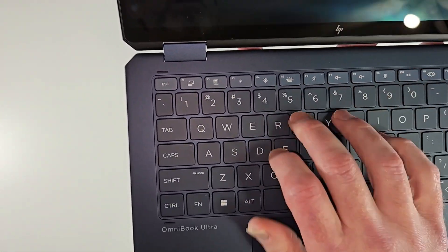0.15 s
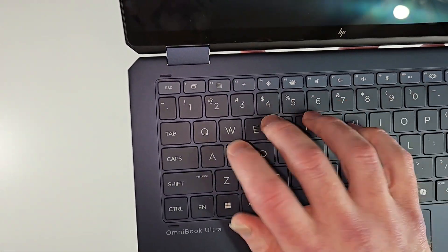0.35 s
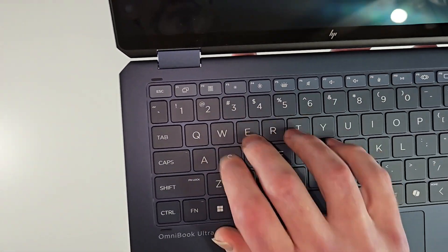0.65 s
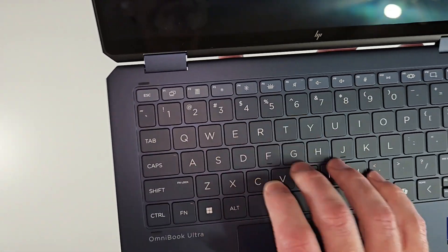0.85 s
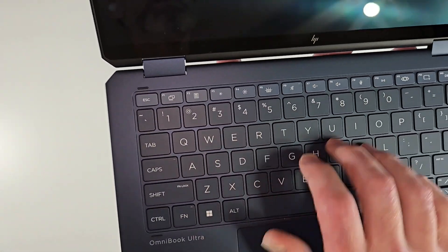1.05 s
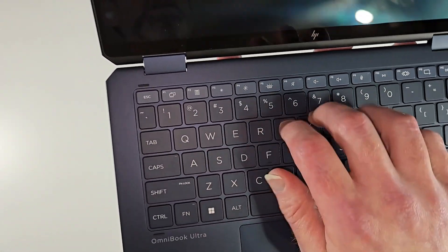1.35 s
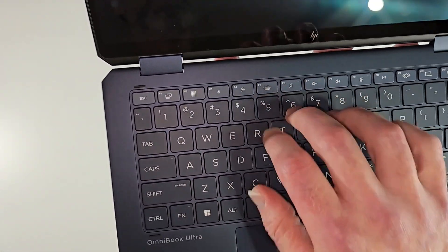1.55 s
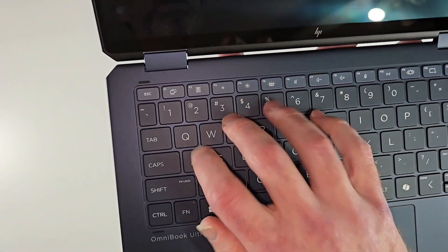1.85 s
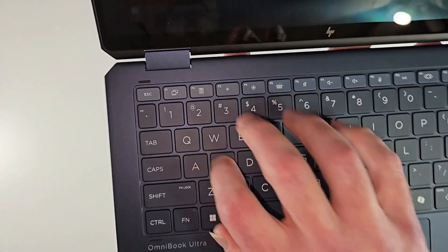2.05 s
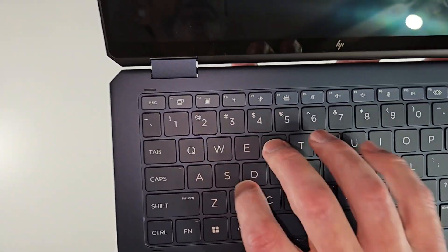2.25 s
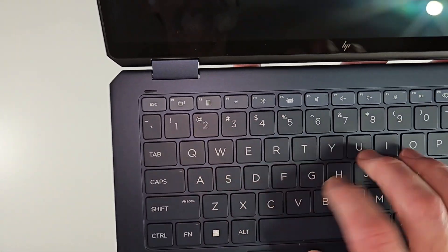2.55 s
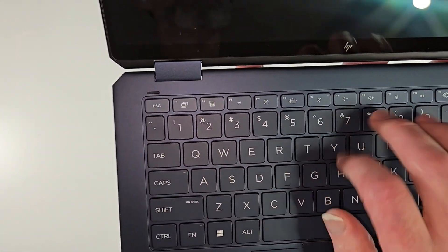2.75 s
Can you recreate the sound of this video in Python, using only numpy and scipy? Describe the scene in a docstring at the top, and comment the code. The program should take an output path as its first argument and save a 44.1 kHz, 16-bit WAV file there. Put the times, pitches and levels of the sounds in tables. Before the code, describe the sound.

Quick, uneven typing on a laptop keyboard runs throughout, about three seconds, close up in stereo. Each stroke is a plastic click with a soft desk thud, with lighter taps and faint finger brushing between. Near 1.7 seconds fingertips catch on key edges with thin rasps. At about 1.9 a dull bump leaves a brief low rumble. Firmer strokes return from 2.4. The small room adds short echoes.

```python
"""Quick typing on a laptop that stands on a desk, heard close up in stereo in a small room.
Each stroke rattles the keycap, then snaps it down: the plastic cracks, the case rings, the desk thuds.
Keys spring back with lighter taps, finger pads land with a round "tok" and brush over the caps.
One dull bump leaves a low rumble. Short room echoes and still air lie behind."""
import sys
import numpy as np
from scipy import signal
from scipy.fft import rfft, irfft
from scipy.io import wavfile

SR = 44100
rng = np.random.default_rng(int(sys.argv[2]) if len(sys.argv) > 2 else 0)


def master(y):
    """Save y as 16-bit WAV."""
    cut = np.clip(np.atleast_2d(y).T, -1, 1)
    pcm = np.round(cut * 32767)  # scale
    wavfile.write(sys.argv[1], SR, pcm.astype(np.int16))


N = 127890
T = np.arange(int(.2 * SR)) / SR  # time axis of one event, s


def keys():
    """Full strokes, plus light taps from first touches, rebounds and key returns."""
    # Each row: start in s, rattle lead in s, thud, case, knock, clack and tick levels in dB,
    # left over right in dB, cap note in Hz.
    strokes = [(-0.02, 0.004, -33, -39, -40, -41, -31, 0.5, 2330),
               (0.1327, 0.0032, -40, -38, -38.5, -36.5, -36, -1, 2027),
               (0.3314, 0.0068, -38.5, -39, -39, -41, -39.5, 1, 2380),
               (0.61, 0.0048, -45, -45.5, -48.0, -43, -39.5, 0, 2154),
               (0.9022, 0.0043, -40, -47, -49.5, -42.5, -39, 0, 2500),
               (1.1001, 0.0042, -40.5, -45.5, -55.5, -49, -48.5, 0.2, 2620),
               (1.267, 0.0036, -33.5, -33, -36.5, -42.5, -37, 0.5, 4260),
               (1.491, 0.0053, -40, -40, -42, -42, -39, 0, 3760),
               (1.8575, 0.0072, -47.5, -45, -38.5, -40.5, -41, -0.5, 2590),
               (2.4393, 0.0025, -34, -44.5, -45.5, -43, -40, 1, 2400),
               (2.571, 0.0041, -36.5, -37.5, -44.5, -53.5, -42.5, -0.5, 4770),
               (2.7656, 0.0093, -38, -39, -40, -40.5, -39.5, 0, 2260)]
    # Each row: start in s, thud, case, knock, clack and tick levels in dB.
    taps = [(0.1165, -48.5, -51, -53, -64, -51.5), (0.1215, -46, -46, -52, -59, -55),
            (0.275, -84, -60, -62.5, -68, -63), (0.3364, -48, -42.5, -34, -45.5, -39.5),
            (0.4279, -54, -66, -61, -57, -50.5), (0.4323, -56, -50, -50.5, -45, -52),
            (0.6151, -51.5, -75, -59, -48, -55), (0.6182, -45, -49.5, -48, -64, -45),
            (0.7134, -48.5, -70, -51, -59, -47.5), (0.7176, -59, -51.5, -74, -63, -49.5),
            (0.788, -58, -82, -53, -72, -57.5), (0.8057, -50, -48, -88, -51.5, -45),
            (1.0074, -49, -54.5, -57.5, -61, -50), (1.0962, -43.5, -41, -45.5, -56.5, -46.5),
            (1.2721, -40.5, -46.5, -47, -42, -45), (1.3517, -54, -54.5, -49.5, -55, -48.5),
            (1.503, -56, -66, -67, -75, -54), (1.6565, -48, -50.5, -59, -67, -50.5),
            (1.6616, -43.5, -73, -47.5, -53.5, -54), (1.681, -44, -41.5, -40, -49.5, -51),
            (1.7247, -56, -50, -67, -68, -57), (1.8483, -53, -40, -65, -52, -48),
            (1.962, -45.5, -50, -49.5, -65, -49), (1.9689, -78, -74, -58, -55, -52.5),
            (2.0925, -70, -53.5, -56.5, -62.5, -52.5), (2.1267, -56, -58, -58.5, -62, -54.5),
            (2.138, -55, -55.5, -86, -59, -53), (2.2014, -67, -67, -62, -61.5, -52),
            (2.3265, -55, -50.5, -52.5, -67, -51), (2.334, -41.5, -65, -53, -53.5, -46),
            (2.5597, -50.5, -60, -55, -60, -53.5), (2.5737, -49, -46.5, -70, -51, -41.5),
            (2.6746, -44.5, -49.5, -74, -61, -48), (2.681, -55.5, -60, -51, -53, -49.5),
            (2.736, -56, -69, -53, -57, -54.5)]
    out = np.zeros((2, N))
    for start_s, lead_s, *levels_db, pan_db, cap_hz in strokes:
        pan = amp(np.array([[pan_db], [-pan_db]]) / 2)
        cap = amp(-10) * note(cap_hz, t60_s=.026)
        add(out, pan * rattle(lead_s, levels_db), start_s - lead_s)
        add(out, pan * snap(levels_db, cap), start_s)
        add(out, pan * bottom_out(*levels_db[:2]), start_s)
    for start_s, *levels_db in taps:
        add(out, snap(levels_db), start_s)
    return out


def snap(levels_db, cap=0):
    """Plastic cracks and buzzes briefly; the case rings, with the cap's own note if given."""
    # Each row: frequency in Hz, gain in dB.
    crack_shape = [(60, -9), (200, 3), (300, -9.5), (900, -9), (2200, -0.5), (3000, -1), (4500, -1),
                   (6000, -7.5), (9000, -2), (10500, -7.5), (12500, -2), (16000, -6.5)]
    snap_s, buzz_s = .0005, .0071
    envelope = np.exp(-T / snap_s) + amp(-8.5) * np.exp(-T / buzz_s)
    crack = colour(noise() * envelope, crack_shape)
    mid_only = np.array([[1], [0]])
    return weight_bands(crack + amp(-19) * case_ring() + cap * mid_only, levels_db)


def rattle(length_s, levels_db):
    """The loose cap chatters under the finger, louder as it goes down."""
    rise_db, stop_s = 9, .0014
    chatter = noise() * amp(3.5 * rng.standard_normal(len(T)))
    rise = amp(rise_db * np.minimum(T / length_s - 1, 0))
    stop = np.exp(-np.maximum(T - length_s, 0) / stop_s)
    bass_cut_db = np.linspace(14, 0, len(levels_db))
    return weight_bands(chatter * rise * stop, np.array(levels_db) - 6.5 - bass_cut_db)


def bottom_out(thud_db, case_db):
    """A key hits bottom: the desk swings a few times and the case gives a hollow note."""
    desk_hz, thump_s = 93.8, .032
    swell = np.sin(np.pi * np.minimum(T / thump_s, 1)) ** 2
    thump = amp(thud_db - 1.5) * swell * np.sin(2 * np.pi * desk_hz * T)
    return thump + amp(case_db - 2) * note(hz=788.5, t60_s=.082)


def case_ring():
    """Mid and side ringing of the case on the desk, a little different under every key."""
    # Each row: frequency in Hz, level in dB, T60 in s.
    modes = [(118, -3, 0.067), (177.3, 9.5, 0.039), (249, -12.5, 0.13), (367.8, -2.5, 0.067),
             (424, -5.5, 0.049), (590, -4.5, 0.07), (666.3, -5, 0.074), (788, -1.5, 0.12),
             (1155, 2.5, 0.039), (1241, 0, 0.046), (1369, -2, 0.06), (2165, -5.5, 0.06),
             (2353, -7.5, 0.072), (2566, -11, 0.076)]
    scatter_db, detune_ratio = 4, .0094
    ring = np.zeros((2, len(T)))
    for k, (hz, db, t60_s) in enumerate(modes):
        size, detune = rng.standard_normal((2, 2, 1))
        mid_sign, side_sign = rng.choice([-1, 1], 2)
        sign = np.array([[1 if k < 3 else mid_sign], [side_sign]])  # lowest modes keep their mid polarity
        ring += sign * amp(db + scatter_db * size) * note(hz * (1 + detune_ratio * detune), t60_s)
    return ring


def finger_pads():
    """Soft landings: two quickly damped notes of the case, a trace of its longer ringing and a faint tick."""
    # Each row: start in s, level in dB, low note in Hz, high note in Hz, tick level in dB.
    landings = [(0.23, -48, 753, 1190, -49), (0.766, -37, 674, 1180, -44), (1.061, -46, 765, 1150, -46),
                (1.196, -39.5, 680, 1050, -43.5), (1.311, -45, 690, 1250, -50),
                (1.571, -42.5, 794, 1134, -42.5), (2.022, -40, 624, 1305, -41.5),
                (2.302, -48.5, 740, 1030, -54), (2.506, -43.5, 680, 1100, -45),
                (2.733, -45.5, 590, 1070, -48), (2.756, -34, 758, 1460, -34.5)]
    tick_hz_db = [(300, 3), (1400, 9), (3000, .5), (15000, 5.5)]
    tick_s = .0067
    out = np.zeros((2, N))
    for start_s, db, low_hz, high_hz, tick_db in landings:
        tok = note(low_hz, t60_s=.042) + amp(-5.5) * note(high_hz, t60_s=.036)
        tick = colour(noise() * np.exp(-T / tick_s), tick_hz_db)
        ring = amp(-23.5) * spread(case_ring(), width=.86)
        add(out, amp(db) * (tok + ring) + amp(tick_db - 8) * tick, start_s)
    return out


def brushing():
    """Skin slides over matt plastic with a grainy hiss, catches on cap edges and slips with a thin rasp."""
    # Each row: start in s, length in s, level in dB.
    slides = [(-.04, 0.12, -52), (0.731, 0.15, -57.5), (0.942, 0.12, -55.5), (1.112, 0.039, -54.5),
              (1.672, 0.043, -48.5), (1.712, 0.042, -49), (1.999, 0.046, -57.5), (2.316, 0.13, -55.5),
              (2.469, 0.049, -58.5), (2.634, 0.037, -54.5), (2.701, 0.056, -56.5), (2.811, 0.05, -64)]
    # Each row: start in s, level in dB.
    catches = [(1.6885, -43), (1.6945, -40), (1.7258, -37), (1.746, -47), (2.389, -41)]
    # Each row of both: frequency in Hz, gain in dB.
    hiss_shape = [(200, -3), (1000, 4.5), (2500, 0), (6000, 0), (8700, 1.5), (12500, 1.5), (16000, 3)]
    rasp_shape = [(300, -20), (7000, -9), (8700, 9), (10500, -6)]
    slip_s = .0034
    out = np.zeros((2, N))
    for start_s, length_s, db in slides:
        grains = noise() * amp(2 * rng.standard_normal(len(T)))
        hiss = spread(unit(colour(grains, hiss_shape)), width=.99)
        arch = np.maximum(np.sin(np.pi * np.minimum(T / length_s, 1)), 0)
        add(out, amp(db) * np.sqrt(arch) * hiss, start_s)
    for start_s, db in catches:
        slip = noise() * np.exp(-T / slip_s)
        add(out, amp(db) * colour(slip, rasp_shape), start_s)
    return out


def bump():
    """A dull bump that darkens as it dies, with a low rumble."""
    # Each row: band centre in Hz, level in dB, T60 in s.
    bump_bands = [(59.6, -6, 0.39), (130, 12.5, 0.21), (236, 17, 0.38), (353, 11, 0.29), (493, 10.5, 0.36),
                  (670, 5.5, 0.36), (1270, -1, 0.22), (3140, -8.5, 0.15), (7150, -20, 0.055),
                  (15000, -31, .06)]
    # Each row: frequency in Hz, gain in dB.
    rumble_shape = [(20, -3), (70, 3), (140, -12.5), (350, -13), (800, -39), (3000, -43.5)]
    # Each row: time in s, level in dB.
    rumble_level = [(1.859, -44.5), (1.951, -46), (2.05, -53.5), (2.2, -67), (2.33, -61), (2.42, -84)]
    times_s, db = np.array(rumble_level).T
    envelope = np.interp(np.arange(N) / SR, times_s, amp(db), left=0, right=0)
    out = spread(unit(colour(noise(N), rumble_shape)) * envelope, width=.3)
    add(out, amp(.5) * tail(bump_bands), start_s=1.8795)
    return out


def room_echo(x):
    """A short echo that builds up over the first milliseconds."""
    # Each row: band centre in Hz, level in dB, T60 in s.
    echo_bands = [(51.3, 6.5, 0.07), (107, -10.5, .28), (218, -8.5, 0.28), (600, -8.5, 0.37),
                  (1460, -9.5, 0.28), (3330, -8, 0.38), (7650, -11.5, 0.32), (14000, -11.5, 0.32)]
    gap_s, build_s = .004, .0076
    echo = tail(echo_bands)
    build = np.clip((np.arange(echo.shape[1]) / SR - gap_s) / build_s, 0, 1)
    return signal.fftconvolve(x, echo * build, axes=1)[:, :N]


def wall_echo(x):
    """The bass and a band near 700 Hz come back once from the wall."""
    # Each row: frequency in Hz, gain in dB.
    wall_shape = [(30, -32), (60, -0.5), (90, 5.5), (140, -4), (250, -28.5), (700, 1), (2000, -65),
                  (8000, -63)]
    out = np.zeros((2, N))
    add(out, amp(-4.5) * colour(x, wall_shape), start_s=.0165)
    return out


def room_air():
    """Still air: faint, steady, low noise."""
    # Each row: frequency in Hz, gain in dB.
    air_shape = [(25, -24.5), (100, 11.5), (300, 1), (700, -9.5), (2000, -19.5), (6000, -28), (16000, -29)]
    return amp(-61.5) * spread(unit(colour(noise(N), air_shape)), width=.35)


def weight_bands(mid_side, levels_db):
    """Set the thud, case, knock, clack and tick bands of a blow; higher bands are wider."""
    # Edges of the five bands in Hz.
    edges_hz = [65, 300, 950, 1700, 5000, 17000]
    # Side-to-mid gain of each band.
    widths = [.08, .22, .42, .8, 1]
    blow_samples = int(.012 * SR)
    out = 0
    for band_hz, db, width in zip(zip(edges_hz, edges_hz[1:]), levels_db, widths):
        band = signal.sosfilt(signal.butter(3, band_hz, "band", fs=SR, output="sos"), mid_side)
        onset_energy = np.sum(band[:, :2 * blow_samples] ** 2, axis=1, keepdims=True)
        out = out + amp(db) * spread(band / np.sqrt(onset_energy / blow_samples), width)
    return out


def tail(bands):
    """Diffuse ringing with a level and decay per band; narrow in the bass, wide in the treble."""
    t = np.arange(SR // 2) / SR
    log_hz = np.log(np.fft.rfftfreq(len(t), 1 / SR) + 1)
    log_centres = np.log([row[0] for row in bands])
    spectrum = rfft(noise(len(t)))
    out = 0
    for share, (hz, db, t60_s) in zip(np.eye(len(bands)), bands):
        envelope = np.exp(-np.log(1000) * t / t60_s)
        envelope /= np.sqrt(np.sum(envelope ** 2))
        band = irfft(spectrum * np.interp(log_hz, log_centres, share), len(t))
        out = out + amp(db) * spread(band, width=np.sqrt(hz / 3500)) * envelope
    return out


def colour(x, shape):
    """Minimum-phase filter through (Hz, dB) points."""
    hz, db = np.array(shape, float).T
    n = 2 * x.shape[-1]
    log_hz = np.log(np.fft.rfftfreq(n, 1 / SR) + 1)
    cepstrum = irfft(np.log(amp(np.interp(log_hz, np.log(hz), db))))
    cepstrum[1:n // 2] *= 2
    cepstrum[n // 2 + 1:] = 0
    return irfft(rfft(x, n) * np.exp(rfft(cepstrum)))[..., :n // 2]


def note(hz, t60_s):
    """A fading sine."""
    return np.exp(-np.log(1000) * T / t60_s) * np.sin(2 * np.pi * hz * T)


def noise(samples=len(T)):
    """Two channels of white noise."""
    return rng.standard_normal((2, samples))


def amp(db):
    """Decibels to gain."""
    return 10 ** (np.asarray(db) / 20)


def unit(x):
    """Scale to rms 1."""
    return x / np.sqrt(np.mean(x ** 2))


def spread(mid_side, width):
    """Mid and side to left and right."""
    mid, side = mid_side
    w = np.clip(width, 0, 1)
    return np.array([mid + w * side, mid - w * side]) / np.sqrt(1 + w * w)


def add(out, x, start_s):
    """Mix x in at a start time, cropped to the scene."""
    i = int(start_s * SR)
    x = x[:, max(-i, 0):max(N - i, 0)]
    out[:, max(i, 0):max(i, 0) + x.shape[1]] += x


def scene():
    """Typing, its echoes, the bump and the still room."""
    typing = keys() + finger_pads() + brushing()
    air = room_air()
    return typing + room_echo(typing) + wall_echo(typing) + bump() + air


def record(dry):
    """A steep low-pass cuts the top treble."""
    top_hz = 15900
    return signal.sosfilt(signal.ellip(10, .2, 80, top_hz, fs=SR, output="sos"), dry)


dry = scene()
out = record(dry)
master(out)
```